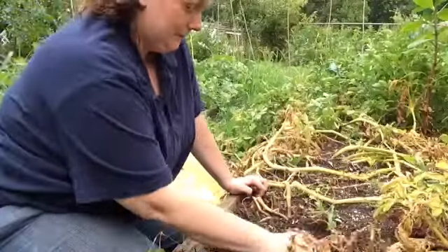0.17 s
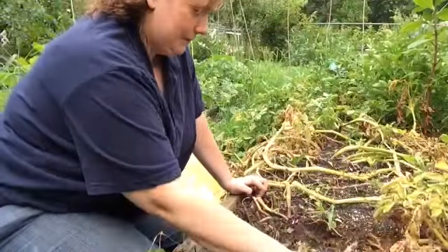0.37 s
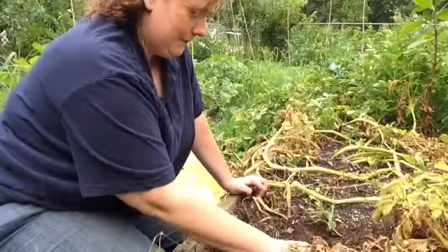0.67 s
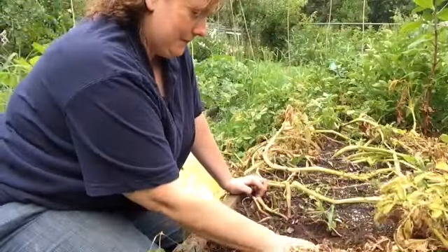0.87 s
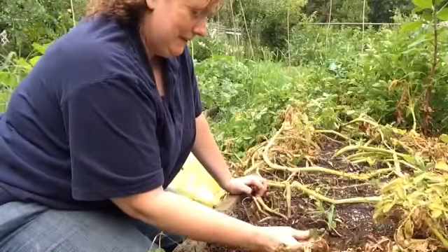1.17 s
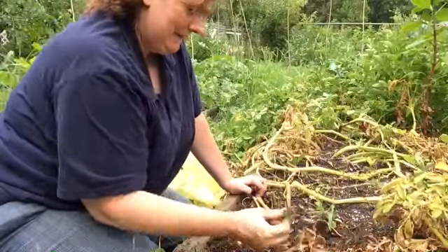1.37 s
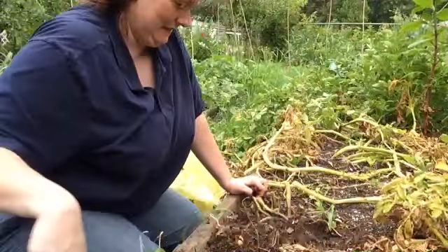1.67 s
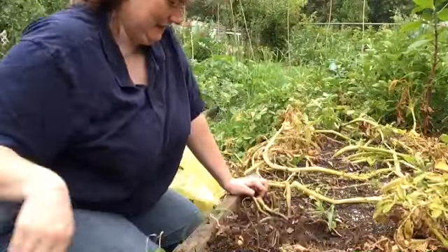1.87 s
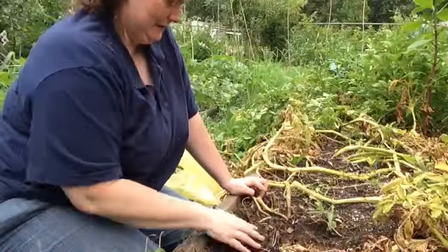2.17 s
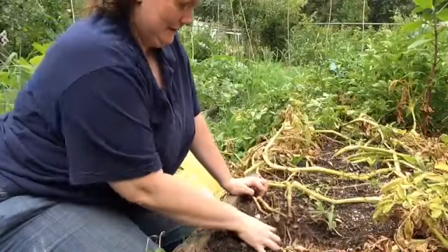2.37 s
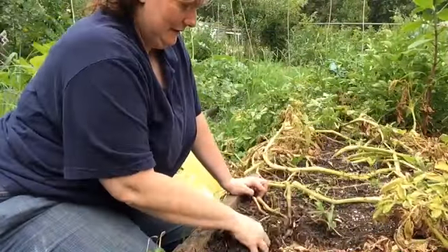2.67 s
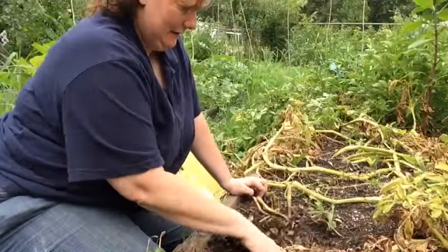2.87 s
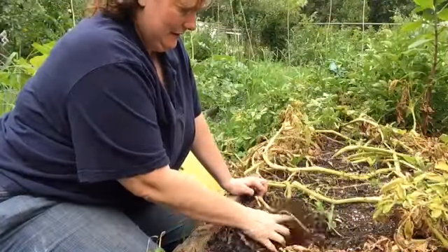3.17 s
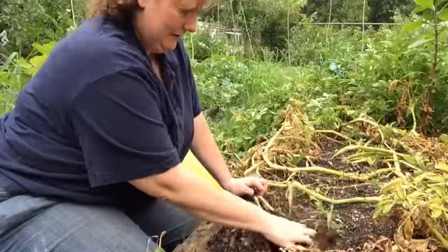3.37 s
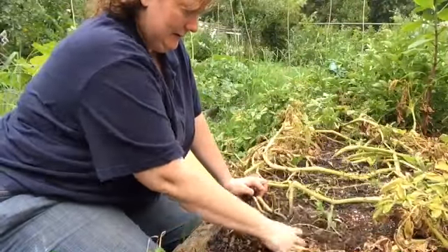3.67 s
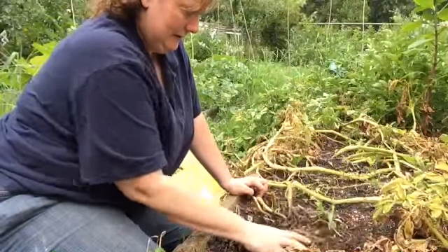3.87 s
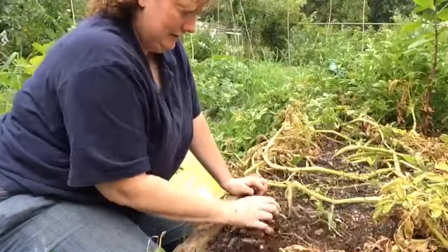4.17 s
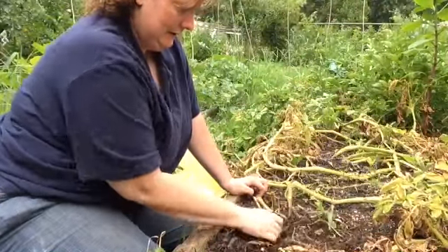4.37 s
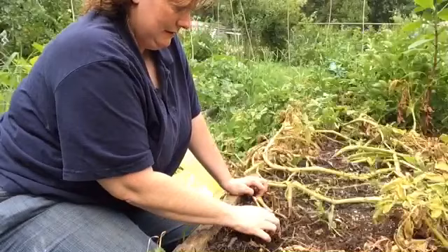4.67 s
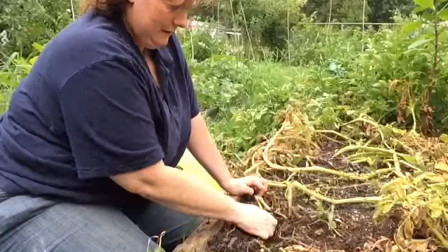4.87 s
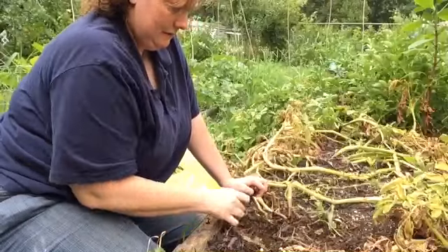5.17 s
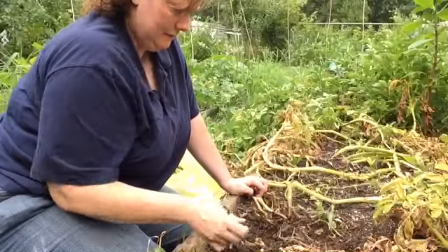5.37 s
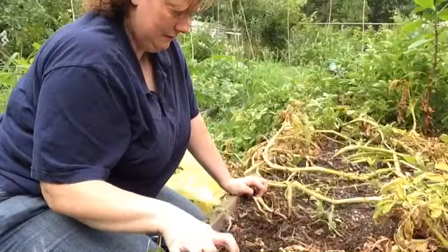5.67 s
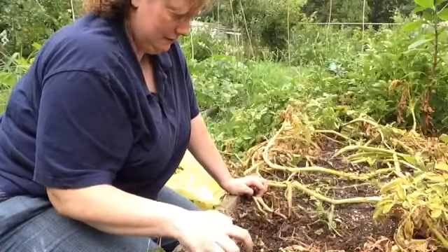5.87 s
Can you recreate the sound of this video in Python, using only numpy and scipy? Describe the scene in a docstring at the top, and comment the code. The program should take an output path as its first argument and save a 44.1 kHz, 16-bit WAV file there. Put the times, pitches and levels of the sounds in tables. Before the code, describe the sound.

A quiet garden, heard close up, with wavering distant traffic rumble and a soft airy hiss throughout. At about 0.07 seconds a tuber lands in a hollow plastic tub with a strong, short, boomy double knock. More knocks follow at 0.3 and 0.4, then small hops fade away by about 0.7. Between 0.25 and 0.5 dry leaves crunch briskly and several stems snap with bright, tiny clicks. From 1.0 to 1.4 there are light ticks, thin brushes, a faint tub touch and two soft, dull pushes into soil. Sparse rustling continues, with more soil thuds near 2.8 and 3.25, a crisp snap around 2.95 and another at 5.05. Faint birds chirp throughout: a thin rising call at 1.45, falling whistles near 2.6 and 4.7, a busier cluster from 3.2 to 3.6, and one last thin call at 5.6. It ends in quiet outdoor air.

```python
"""A tuber knocks into a hollow plastic tub and bounces to rest, over distant traffic rumble and a soft outdoor hiss.
Hands work loose garden soil among dry stems: leaves rustle, small stems snap, and far birds chirp and whistle.
Tub blows are pulses through decaying modes; leaves and air are shaped noise; snaps are clicks with a short ring;
soil pushes are dull sine thuds with a noise puff; bird notes are fluttering glides with a noise-tail echo."""
import sys
import numpy as np
from scipy import signal
from scipy.fft import rfft, irfft, next_fast_len
from scipy.io import wavfile
from scipy.ndimage import uniform_filter1d, map_coordinates

SR = 44100
rng = np.random.default_rng(int(sys.argv[2]) if len(sys.argv) > 2 else 0)


def to_wav(s):
    """Save 16-bit WAV."""
    ch = np.atleast_2d(s).T  # columns
    pcm = np.round(np.clip(ch, -1, 1) * 32767)  # PCM
    wavfile.write(sys.argv[1], SR, pcm.astype(np.int16))


N = 264688
T = np.arange(N) / SR  # seconds


def amp(db):
    """Decibels to gain."""
    return 10 ** (np.asarray(db) / 20)


def unit(x):
    """Scaled to rms 1."""
    return x / np.sqrt(np.mean(x ** 2) + 1e-20)


def along(rows):
    """A (seconds, value) curve at every sample."""
    return np.interp(T, *np.transpose(rows))


def wobble(rate):
    """A smooth random curve, rate knots a second."""
    knots = rng.standard_normal(int(N * rate / SR) + 4)
    return map_coordinates(knots, [T * rate])


def add_at(out, s, sound):
    """Mix a sound into out, starting at s seconds."""
    out[round(s * SR):][:len(sound)] += sound


def filtered(x, response):
    """x times a response of frequency."""
    size = next_fast_len(N + 8192)
    hz = np.fft.rfftfreq(size, 1 / SR)
    return irfft(rfft(x, size) * response(hz), size)[:N]


def coloured(x, spectrum):
    """x through (Hz, dB) points on a log axis, rms 1."""
    f, db = np.transpose(spectrum)
    return unit(filtered(x, lambda hz: amp(np.interp(np.log(hz + 1), np.log(f), db))))


def patched(x, patchy_db, window, bins, frames):
    """x with random patches of gain, smoothed over bins of frequency and frames of time."""
    z = signal.stft(x, nperseg=window)[2]
    field = uniform_filter1d(rng.standard_normal(z.shape), bins, 0)
    field = uniform_filter1d(field, frames, 1)
    return signal.istft(z * amp(patchy_db * unit(field)), nperseg=window)[1][:N]


def patchy(patchy_db):
    """White noise with random patches of gain in time and frequency."""
    return patched(rng.standard_normal(N), patchy_db, window=512, bins=6, frames=12)


# Loudness of far traffic. Each row: time in seconds, rumble level in dB.
RUMBLE_LEVEL = [(0.0, -52.5), (0.5, -52), (1.0, -56), (1.4, -54), (1.94, -58.5), (2.31, -54.5), (2.7, -57),
                (3.0, -54.5), (3.6, -55), (4.01, -56.5), (4.61, -53), (4.98, -57), (5.43, -55),
                (6.0, -56.5)]
# Tone of the traffic. Each row: frequency in Hz, relative level in dB per Hz.
RUMBLE_TONE = [(15, -50), (25, -60), (41, -5), (65, 4), (108, 4.5), (141, -4.5), (184, -7), (289, -20),
               (360, -39), (400, -15.5), (520, -26), (880, -120)]
# Loudness of air and foliage. Each row: time in seconds, hiss level in dB.
HISS_LEVEL = [(0.0, -62.5), (0.55, -61), (0.9, -65.5), (1.3, -62), (1.94, -65), (2.76, -62.5), (3.05, -64),
              (3.46, -63.5), (4.01, -64), (5.2, -65), (6.0, -64.5)]
# Tone of air and foliage. Each row: frequency in Hz, relative level in dB per Hz.
HISS_TONE = [(150, -48), (250, -9.5), (360, 0), (421, -10), (459, -2.5), (527, -3.5), (813, -4),
             (1250, -8.5), (2990, -10.5), (8460, -16), (15800, -27.5)]


def background():
    """Far traffic rumble that wavers, and a smooth hiss of air and foliage: two bands of shaped noise."""
    rumble_gain = amp(along(RUMBLE_LEVEL) + 0.5 * wobble(6))
    rumble = rumble_gain * coloured(patchy(patchy_db=0.5), RUMBLE_TONE)
    hiss_gain = amp(along(HISS_LEVEL) + 0.9 * wobble(3.5))
    hiss = hiss_gain * coloured(patchy(patchy_db=1.2), HISS_TONE)
    return rumble + hiss


# Thin rising "tsip" calls. Each row: start in seconds, top pitch in Hz, level in dB.
TSIP_CALLS = [(1.44, 7650, -62), (3.335, 7440, -59), (3.455, 7230, -64.5), (5.59, 7260, -60)]
TSIP_S, TSIP_HOARSE_HZ = 0.048, 1555
TSIP_START, TSIP_MIDDLE = 0.85, 0.96  # pitches as shares of the top
# Falling whistles. Each row: start in seconds, length in seconds, start pitch in Hz, end pitch in Hz,
# level in dB, hoarseness in Hz.
FALLING_WHISTLES = [(2.596, 0.25, 4540, 3930, -71, 910), (2.629, .16, 3750, 3190, -65, 479),
                    (2.759, .19, 3150, 2845, -72, 351), (4.696, .12, 3710, 3130, -69, 257),
                    (4.709, .25, 4090, 3010, -73.5, 303), (4.83, 0.24, 3060, 2595, -72.5, 220)]
WHISTLE_SAG = 0.55  # share of the fall done by the middle
# Short, nearly level chirps. Each row: start in seconds, length in seconds, middle pitch in Hz, level in dB,
# hoarseness in Hz.
LEVEL_CHIRPS = [(0.868, 0.095, 4280, -70, 506), (1.354, 0.095, 5720, -67, 720),
                (1.39, .052, 4360, -66, 500), (1.902, .1, 5860, -70.5, 1830), (2.143, 0.13, 4950, -75, 503),
                (2.52, 0.14, 3360, -69.5, 600), (3.538, 0.069, 6280, -65.5, 1200),
                (3.56, .05, 5190, -69, 600), (4.41, 0.043, 3670, -70, 600)]
CHIRP_DROOP = 0.0183  # pitch starts this share above the middle and ends this share below it
# Arched calls, one high and one low. Each row: start in seconds, length in seconds, top pitch in Hz,
# arch depth as a share of the top, level in dB.
ARCHED_CALLS = [(3.226, .09, 3325, .2, -62), (3.36, .14, 679, 0.075, -65.5)]
ARCH_HOARSE_HZ = 301.6


def songs():
    """Every note as (start s, length s, start Hz, middle Hz, end Hz, dB, hoarseness Hz)."""
    notes = []
    for s, hz, db in TSIP_CALLS:
        notes.append((s, TSIP_S, TSIP_START * hz, TSIP_MIDDLE * hz, hz, db, TSIP_HOARSE_HZ))
    for s, length, start, end, db, hoarse in FALLING_WHISTLES:
        middle = start + WHISTLE_SAG * (end - start)
        notes.append((s, length, start, middle, end, db, hoarse))
    for s, length, hz, db, hoarse in LEVEL_CHIRPS:
        notes.append((s, length, hz * (1 + CHIRP_DROOP), hz, hz * (1 - CHIRP_DROOP), db, hoarse))
    for s, length, top, arch, db in ARCHED_CALLS:
        foot = top * (1 - arch)
        notes.append((s, length, foot, top, foot, db, ARCH_HOARSE_HZ))
    return notes


def birds(notes, echo_db=-5, overtone_db=-12):
    """Gliding notes blurred by a fast flutter of phase and strength, with a weak octave and an echo off the trees."""
    out = np.zeros(N + SR)
    for s, length, start_hz, middle_hz, end_hz, db, hoarse_hz in notes:
        u = np.linspace(0, 1, int(length * SR))  # progress through the note
        glide = np.polyval(np.polyfit([0, 0.5, 1], [start_hz, middle_hz, end_hz], 2), u)
        knots = rng.standard_normal((2, 600))
        at = u * length * np.clip(hoarse_hz, 20, 2500)
        flutter = map_coordinates(knots[0], [at]) + 1j * map_coordinates(knots[1], [at])
        turn = np.exp(2j * np.pi * np.cumsum(glide) / SR)
        # the steady 0.33 keeps some clear pitch; squaring the turn gives the octave
        note = np.real((0.33 + flutter) * (turn + amp(overtone_db) * turn ** 2))
        envelope = np.sin(np.pi * u) ** 0.22
        add_at(out, s, amp(db) * unit(note) * envelope)
    t = np.arange(SR // 3) / SR
    tail = rng.standard_normal(len(t)) * amp(-60 * t / 0.41)  # falls 60 dB in 0.41 s
    echo = signal.fftconvolve(out, tail / np.linalg.norm(tail))[:len(out)]
    return (out + amp(echo_db) * echo)[:N]


# Fingers pushing into the soil. Each row: start in seconds, level in dB, pitch in Hz.
SOIL_PUSHES = [(1.121, -45.5, 94), (1.354, -46, 97), (2.812, -45.5, 71), (3.251, -48.5, 91.5)]


def soil():
    """Soft earth does not ring: each push is a dull thud with a puff of crumbs."""
    out, t = np.zeros(N + SR), np.arange(SR // 10) / SR
    puff_band = signal.butter(2, [200, 750], "band", fs=SR, output="sos")
    puffs = signal.sosfilt(puff_band, rng.standard_normal((len(SOIL_PUSHES), len(t))))
    swell = t / 0.013 * np.exp(1 - t / 0.014)
    for (s, db, hz), puff in zip(SOIL_PUSHES, puffs):
        thud = np.sin(2 * np.pi * hz * t)
        add_at(out, s, amp(db) * swell * (thud + amp(-23.0) * unit(puff)))
    return out[:N]


def crackle(patchy_db):
    """Dense tiny grains of uneven size and pitch over a steady bed of noise."""
    sizes = amp(np.clip(4 * rng.standard_normal(N), -20, 11))
    sizes = sizes * (rng.random(N) < 0.1)  # one sample in ten carries a grain
    grains = unit(sizes * rng.standard_normal(N)) + 1.06 * rng.standard_normal(N)
    return patched(grains, patchy_db, window=128, bins=4, frames=3)


# Hands moving among the leaves. Each row: time in seconds, rustle level in dB,
# share of fine bright crumbling from 0 to 1.
HAND_EFFORT = [(0.0, -92, .55), (0.212, -61.5, 0.6), (0.268, -55, 0.26), (0.4, -47.5, 0.75),
               (0.55, -51, 0.51), (0.72, -60, 0.63), (0.856, -64.5, .55), (1.302, -64.5, 0.42),
               (1.7, -70.5, 0.2), (2.06, -74.5, .3), (2.4, -69.5, 0.2), (3.4, -64.5, 0.47),
               (3.68, -67, 0.37), (4.62, -71.5, 0.4), (6.0, -75, 0.9)]
# Quick brushes through the leaves. Each row: time of the crest in seconds, level in dB, rise in ms, fall in ms,
# share of fine bright crumbling from 0 to 1.
LEAF_BRUSHES = [(0.229, -54, 3, 28, .2), (0.266, -55, 12, 13, 1), (.282, -52.5, 2, 17, 0.5),
                (0.302, -48.5, 4.7, 8.9, 0), (0.353, -39.5, 18, 12, 0.3), (.425, -51, 4, 12, 0.6),
                (0.451, -44, 12, 15.4, 0), (.485, -55, 19, 7.5, 0.4), (.68, -63, 8.6, 7.5, 0.9),
                (1.101, -60, 4, 18, 1), (1.2, -59.5, 3.7, 17, 1), (1.47, -67, 19, 15, 0.5),
                (1.565, -65, 8.7, 24, 0.8), (1.61, -71, 6, 7, .8), (1.81, -67, 11, 13, 1),
                (2.07, -70, 19, 11, 0.6), (2.33, -69.5, 28, 92, 0.86), (2.92, -63, 6.2, 44, 0.4),
                (3.01, -68, 11, 15, 0.6), (3.21, -68, 8, 24, 0.7), (3.52, -66, 30, 11, .6),
                (4.32, -66, 8, 19, 0)]
# Tone of the leaf crunch. Each row: frequency in Hz, relative level in dB per Hz.
CRUNCH_TONE = [(590, -45), (1000, -10), (2640, -4), (3360, 2), (3860, -1), (4440, 2), (7550, -3),
               (11600, -8), (15800, -9)]
# Tone of the fine crumbling. Each row: frequency in Hz, relative level in dB per Hz.
CRUMBLE_TONE = [(3000, -24), (6000, -7), (8500, 0.5), (11000, 0.5), (14000, -2.5), (15800, -17.5)]


def leaves():
    """Leaves crunch and soil crumbles, two colours of crackle as loud as the hand moves."""
    s, db, share = np.transpose(HAND_EFFORT)
    effort = amp(np.interp(T, s, db))
    fine_share = np.clip(np.interp(T, s, share), 0, 1)
    coarse = effort * np.sqrt(1 - fine_share)
    fine = effort * np.sqrt(fine_share)
    for s, db, rise_ms, fall_ms, share in LEAF_BRUSHES:
        u = (T - s) * 1000  # ms from the crest
        stroke = amp(db) * np.exp(-np.where(u < 0, (u / rise_ms) ** 2, u / fall_ms))
        coarse = coarse + stroke * np.sqrt(np.clip(1 - share, 0, 1))
        fine = fine + stroke * np.sqrt(np.clip(share, 0, 1))
    crunch = coarse * amp(1.47 * wobble(40)) * coloured(crackle(patchy_db=2.0), CRUNCH_TONE)
    crumble = fine * amp(0.6 * wobble(65)) * coloured(crackle(patchy_db=2.0), CRUMBLE_TONE)
    return crunch + crumble


TICK_OVER_DB, TICK_SPREAD_DB = 10, 3  # level over the brush, random scatter
TICK_HZ, TICK_CLICK_DB = 10700, -10  # typical centre, click relative to the ring


def ticks(count=3):
    """Twigs ticking as the hand brushes past: faint random snaps with the columns of STEM_SNAPS."""
    chance = rng.standard_normal((len(LEAF_BRUSHES), count, 3))
    found = []
    for (s, db, _, fall_ms, _), rows in zip(LEAF_BRUSHES, chance):
        for delay, loudness, pitch in rows:
            start = s + abs(delay) * fall_ms / 1000
            level = db + TICK_OVER_DB + TICK_SPREAD_DB * loudness
            found.append((start, level, TICK_HZ * 1.15 ** pitch, TICK_CLICK_DB))
    return found


# Stems snapping. Each row: start in seconds, level in dB, ring centre in Hz,
# broad click in dB relative to the ring.
STEM_SNAPS = [(.266, -41, 11800, -12), (.28, -29.5, 11500, -19), (0.345, -27, 7200, -12),
              (.366, -30.5, 4900, -15), (.393, -39, 9200, -12), (.424, -36, 10500, -9),
              (0.448, -35, 4500, -6), (.49, -34, 14500, -12), (.85, -43, 6740, -9), (1.032, -46, 9400, -11),
              (1.047, -39.5, 9050, 6), (1.076, -35.5, 9540, -2), (1.103, -42, 10500, -14),
              (1.117, -42, 10500, -14), (1.168, -48, 10800, -12), (1.26, -46, 10500, -5),
              (1.584, -43, 11500, 2), (2.77, -45, 10000, 1), (2.956, -37, 12900, 4.5),
              (3.51, -46, 10500, -6), (5.046, -38.5, 9300, 7)]
RING_MS, RING_MS_PER_DB = 2.2, -0.1  # 60 dB decay at a click of 0 dB; a cleaner break rings shorter


def stems():
    """Each snap is a broad click with a brief ring."""
    out, t = np.zeros(N + SR), np.arange(256) / SR
    click = np.exp(-t / 0.00004) - 0.39 * np.exp(-t / 0.00016)
    for s, db, hz, click_db in STEM_SNAPS + ticks():
        ring_ms = np.clip(RING_MS + RING_MS_PER_DB * click_db, 0.5, 5)
        ring = amp(-60000 * t / ring_ms) * np.sin(2 * np.pi * hz * t)
        add_at(out, s, amp(db) * (ring + amp(click_db) * click))
    return out[:N]


# The tuber lands hard and rocks over onto a second contact. Each row: start in seconds, blow in dB,
# boom of the low modes in dB, body modes in dB, contact in ms, free ringing in ms,
# rock-over blow in dB, rock-over boom in dB.
HARD_LANDINGS = [(0.0653, -20, 4.5, 0.5, 0.27, 37, -16.5, -4.5),
                 (0.3066, -23, -1.5, 5.5, 0.32, 22, -39.5, 11.5),
                 (0.404, -24, 3.5, -6.5, 1.13, 29, -27, -14), (0.581, -38, 7, 1.5, 1.9, 57, -44, 3)]
ROCK_S, ROCK_MS = 0.013, 2.43  # delay and contact of the rock-over
# Light touches and small hops. Each row: start in seconds, blow in dB, contact in ms.
LIGHT_HOPS = [(0.055, -39, 2.4), (0.141, -51, 2.3), (0.474, -32, .78), (.513, -40.5, 0.69),
              (0.553, -41, 0.79), (.625, -38.5, 0.39), (0.657, -39.5, 0.46), (0.687, -44, 1.5),
              (0.719, -55, 2.1), (1.214, -46, 0.97)]
HOP_BOOM_DB, HOP_BODY_DB, HOP_FREE_MS = 2.5, -3, 44
# Glancing taps on the rim. Each row: start in seconds, blow in dB.
GLANCING_TAPS = [(0.118, -35.5), (0.284, -45.5)]
RIM_BOOM_DB, RIM_BODY_DB, RIM_DB = -4, -6, 17  # low modes, body modes, rim mode
RIM_MS, RIM_FREE_MS = 0.59, 19  # contact, free ringing


def contacts():
    """Every touch as (start s, blow dB, boom dB, body dB, rim mode dB, contact ms, free ringing ms)."""
    touches = []
    for s, db, boom, body, contact_ms, free_ms, rock_db, rock_boom in HARD_LANDINGS:
        touches.append((s, db, boom, body, 0, contact_ms, free_ms))
        # the rock-over is damped at the same moment as the landing
        touches.append((s + ROCK_S, rock_db, rock_boom, 0, 0, ROCK_MS, free_ms - 1000 * ROCK_S))
    for s, db, contact_ms in LIGHT_HOPS:
        touches.append((s, db, HOP_BOOM_DB, HOP_BODY_DB, 0, contact_ms, HOP_FREE_MS))
    for s, db in GLANCING_TAPS:
        touches.append((s, db, RIM_BOOM_DB, RIM_BODY_DB, RIM_DB, RIM_MS, RIM_FREE_MS))
    return touches


# Ringing modes of the plastic tub. Each row: frequency in Hz, relative level in dB, 60 dB decay in seconds.
TUB_MODES = [(96.6, -1.5, 0.15), (125, -5.5, 0.075), (182.5, 0.5, 0.088), (238, -6, 0.063),
             (360.4, -11.5, 0.058), (458, -6, 0.032), (617, -7, 0.022), (770, -18.5, 0.041),
             (1078, -13, 0.024), (1200, -23, 0.034), (1660, -21, 0.02), (2080, -45, .015), (3300, -38, .01)]


def tub():
    """Each bounce pushes the wall with a smooth pulse: a long soft contact leaves the high modes unrung."""
    out, t = np.zeros(N + SR), np.arange(SR // 4) / SR
    hz, level_db, t60 = np.transpose(TUB_MODES)[:, :, None]
    ring = amp(-60 * t / t60) * np.sin(2 * np.pi * hz * t)
    touches = contacts()
    scatter = rng.standard_normal((len(touches), len(TUB_MODES)))
    for (s, db, boom_db, body_db, rim_db, contact_ms, free_ms), chance in zip(touches, scatter):
        strength = amp(db + level_db[:, 0] + 2 * chance)
        # where the blow lands decides which modes it drives
        strength[:4] *= amp([boom_db, boom_db, body_db, body_db])
        strength[1:3] *= -1  # these two modes bulge inward where the others bulge out
        strength[7] *= amp(rim_db)
        u = t[:SR // 50] * 6000 / np.clip(contact_ms, 0.1, 8)
        push = u * np.exp(-u)
        struck = np.convolve(strength @ ring, push / push.sum())[:len(t)]
        # the tuber settles against the wall again and damps it, by 900 dB a second
        damping = amp(-900 * np.clip(t - free_ms / 1000, 0, None))
        add_at(out, s, damping * struck)
    # the knocks lose their lowest rumble: little passes below about 74 Hz
    return signal.sosfilt(signal.butter(6, 74, "high", fs=SR, output="sos"), out[:N])


def scene():
    """All sources summed at one microphone."""
    return (background() + birds(songs()) + soil() + leaves() + stems() + tub())[None]


TOP_HZ = 15830


def record(dry):
    """A sharp band limit: nothing passes from TOP_HZ up."""
    return filtered(dry[0], lambda hz: hz < TOP_HZ)[None]


dry = scene()
out = record(dry)
to_wav(out)
```